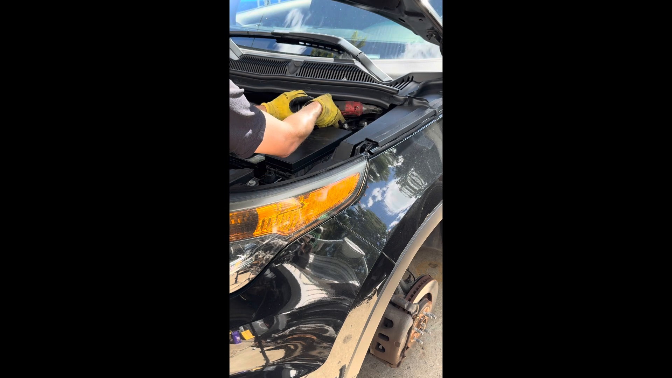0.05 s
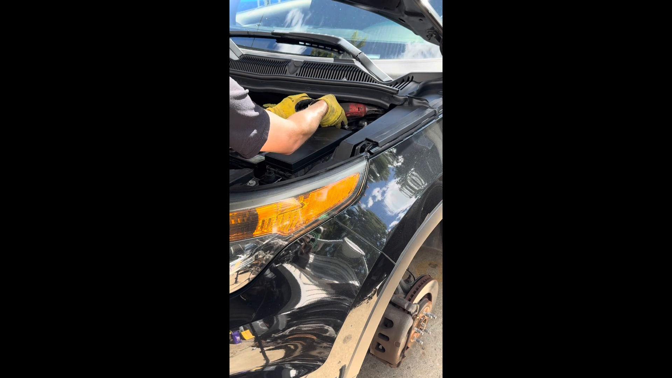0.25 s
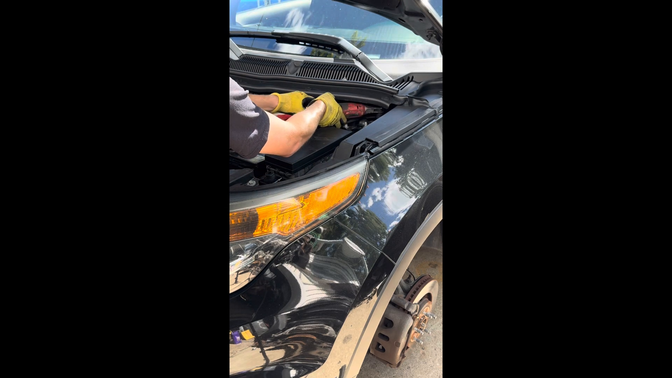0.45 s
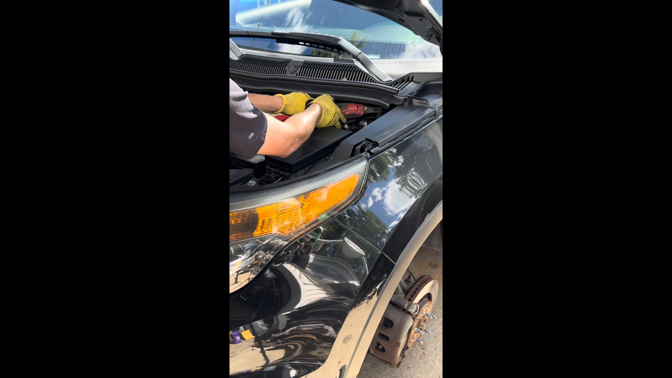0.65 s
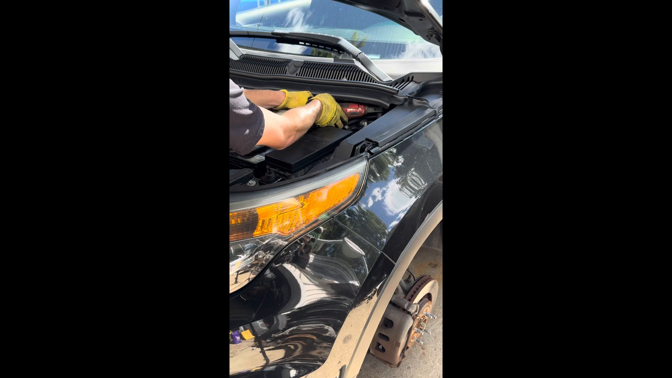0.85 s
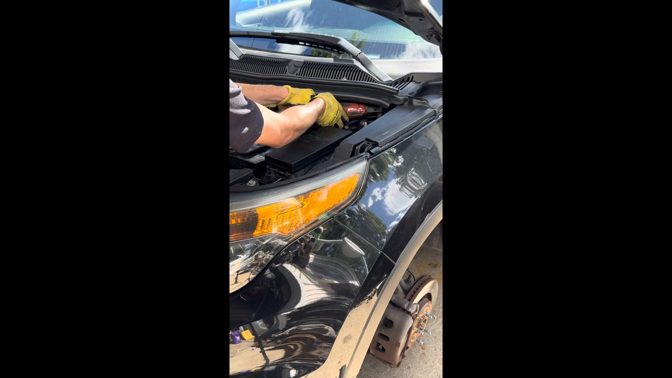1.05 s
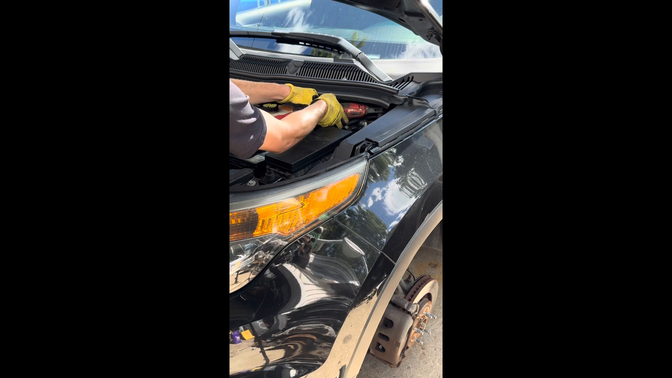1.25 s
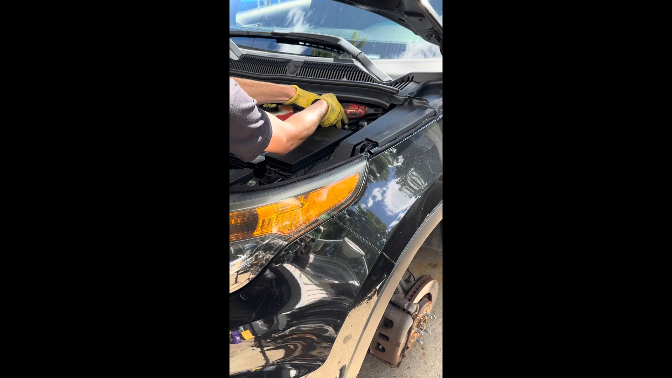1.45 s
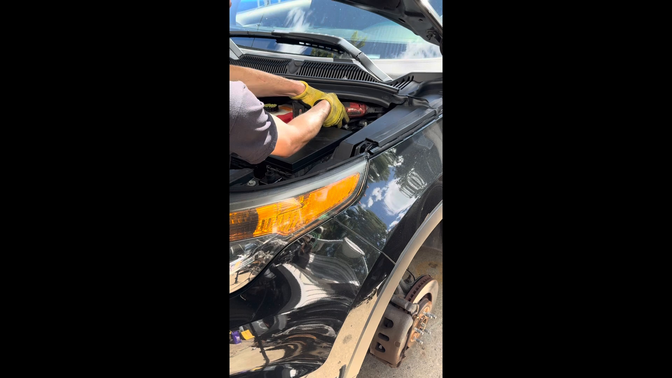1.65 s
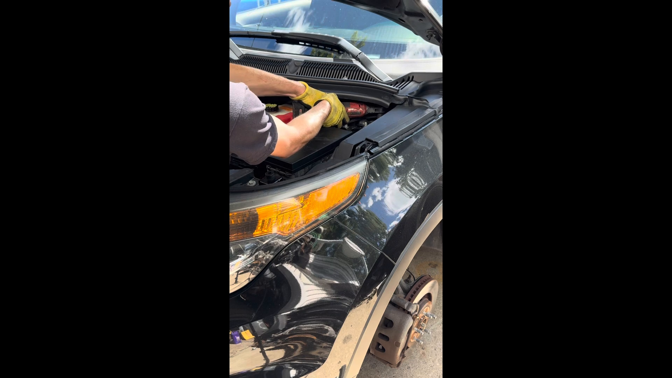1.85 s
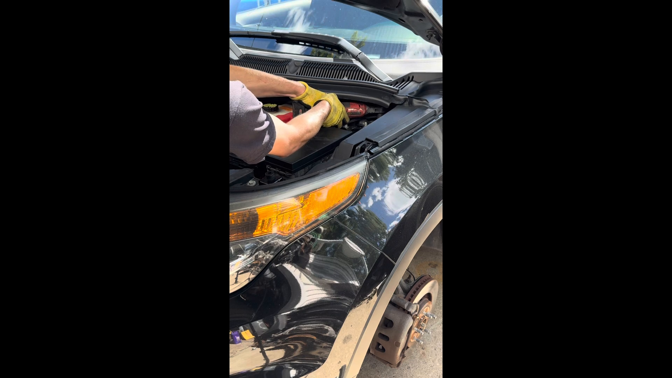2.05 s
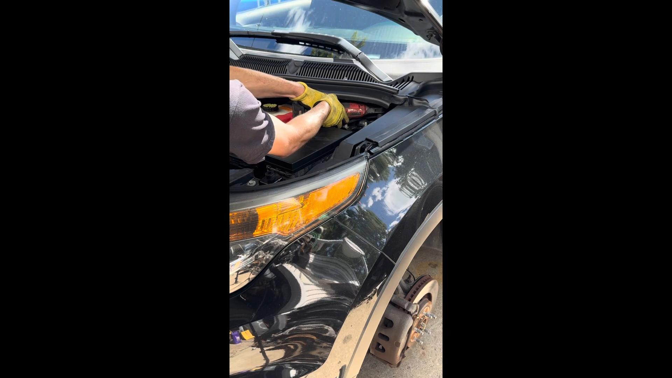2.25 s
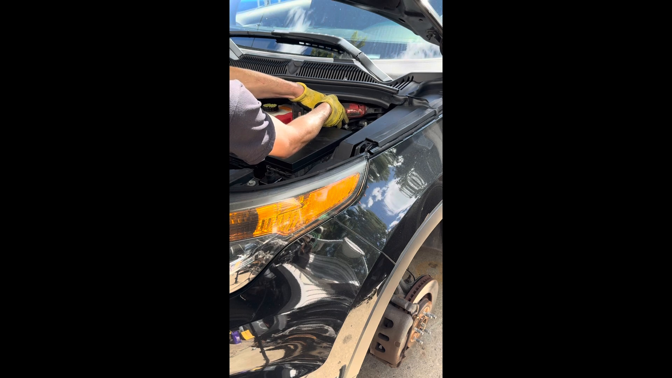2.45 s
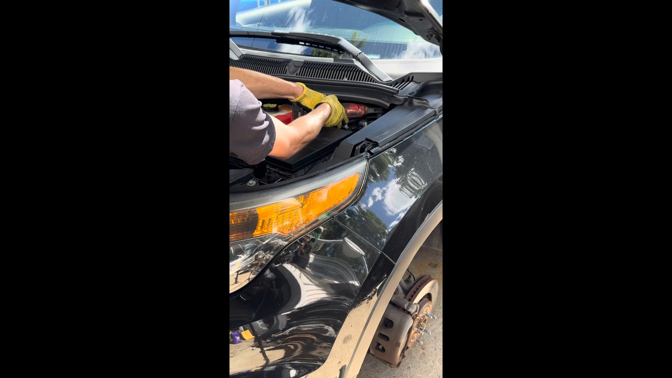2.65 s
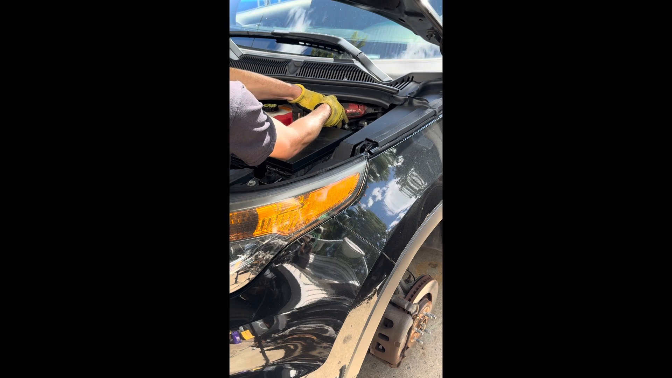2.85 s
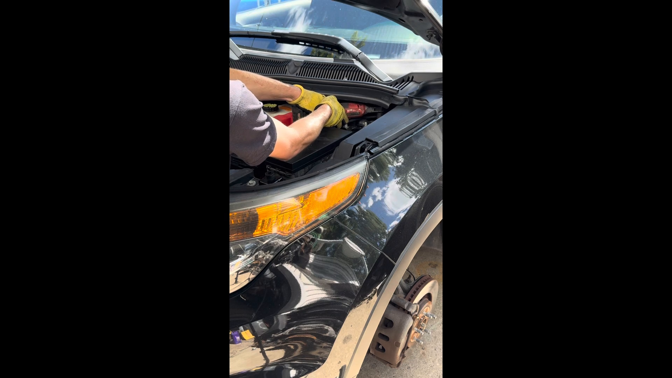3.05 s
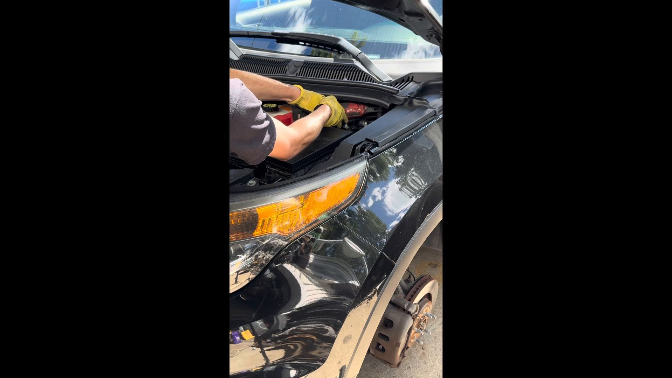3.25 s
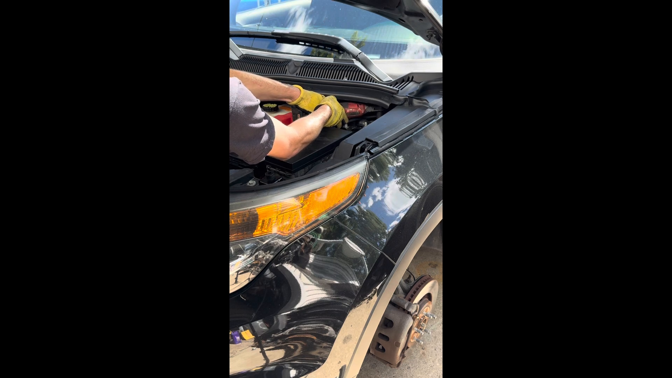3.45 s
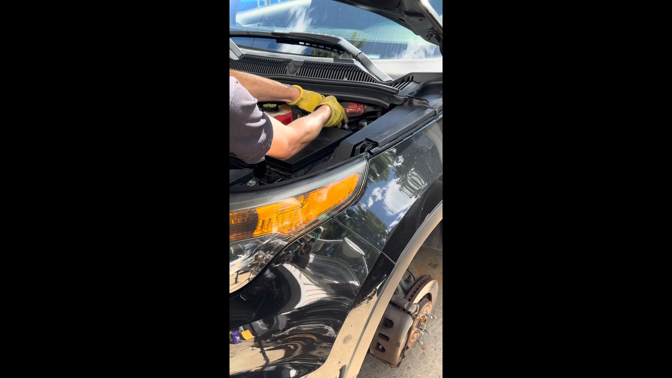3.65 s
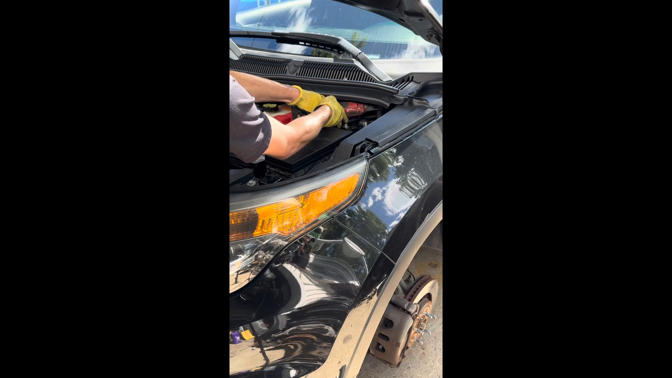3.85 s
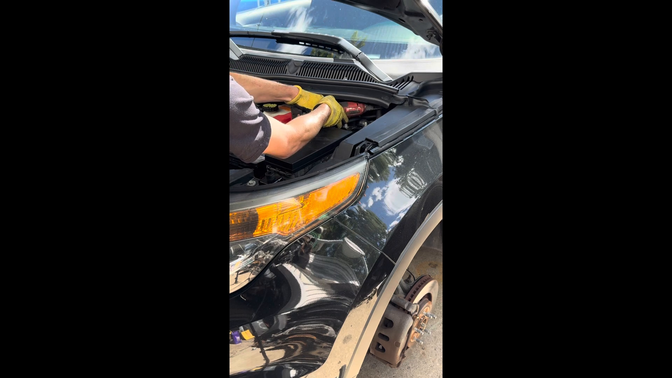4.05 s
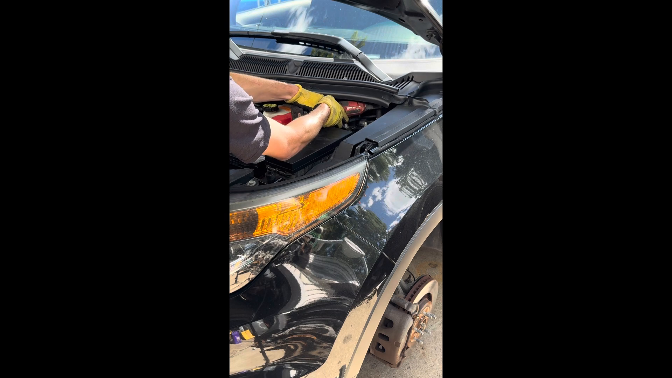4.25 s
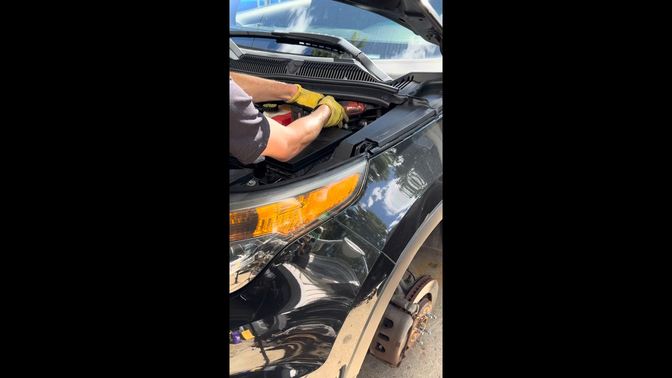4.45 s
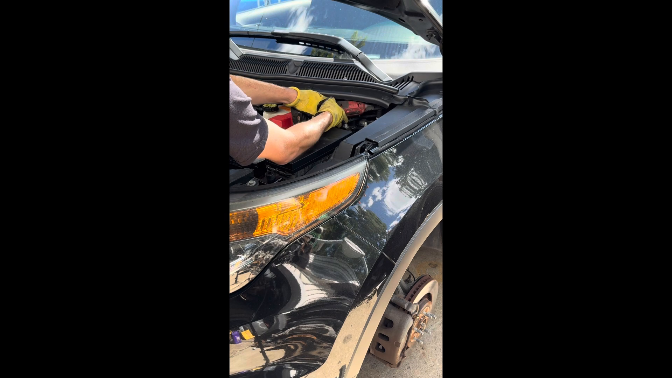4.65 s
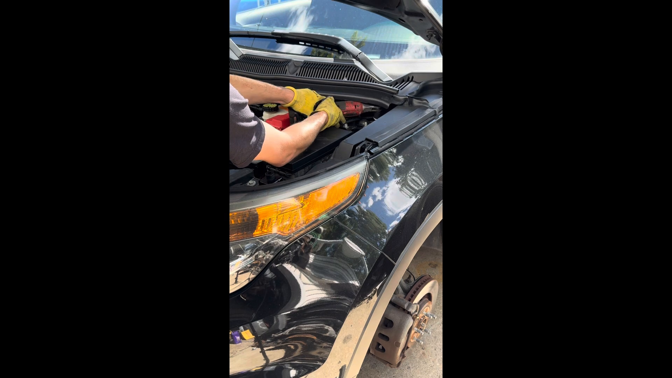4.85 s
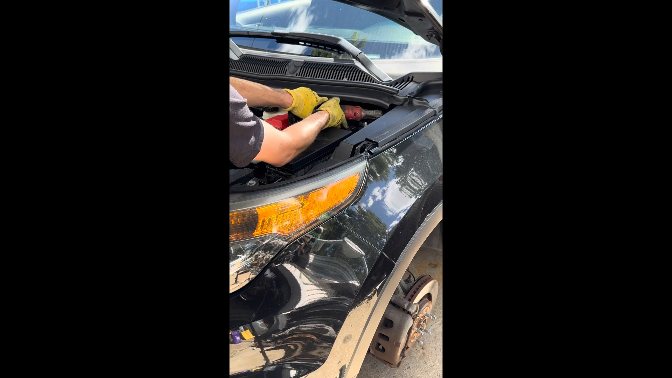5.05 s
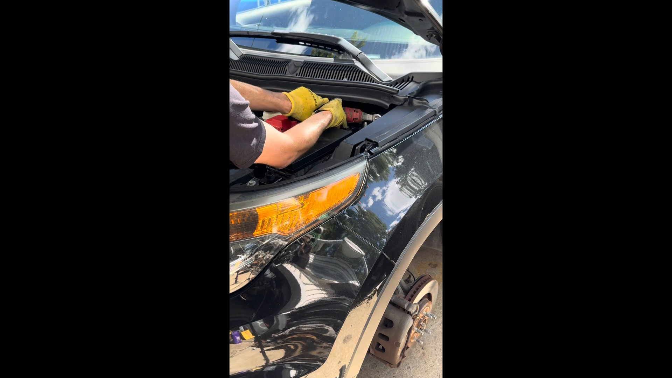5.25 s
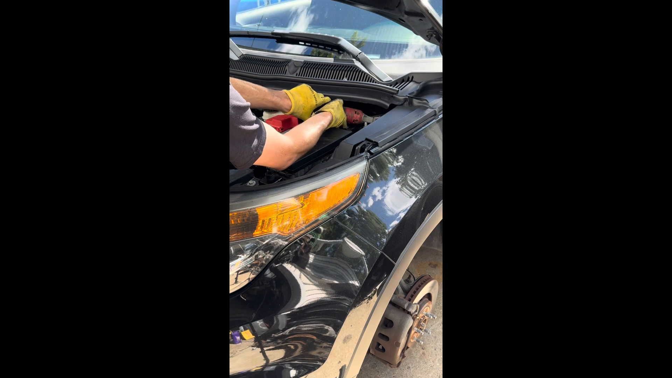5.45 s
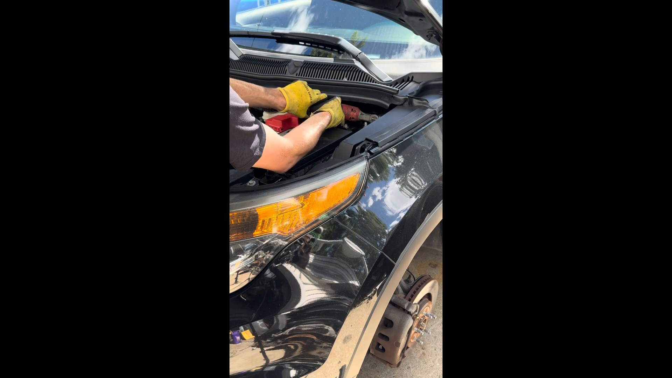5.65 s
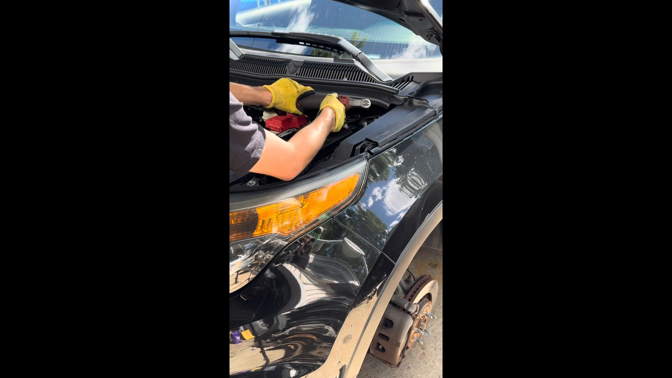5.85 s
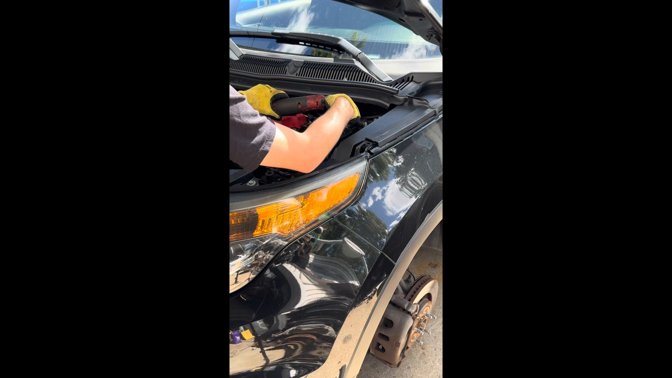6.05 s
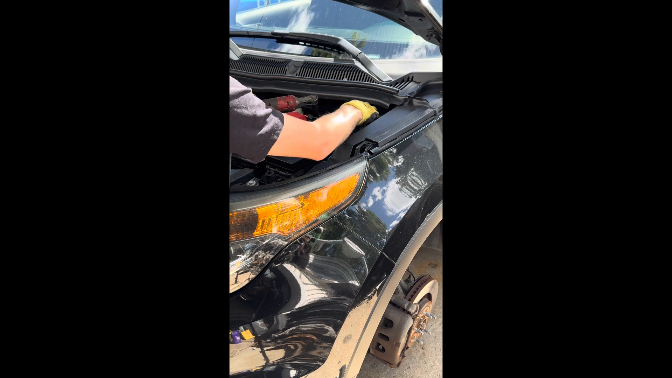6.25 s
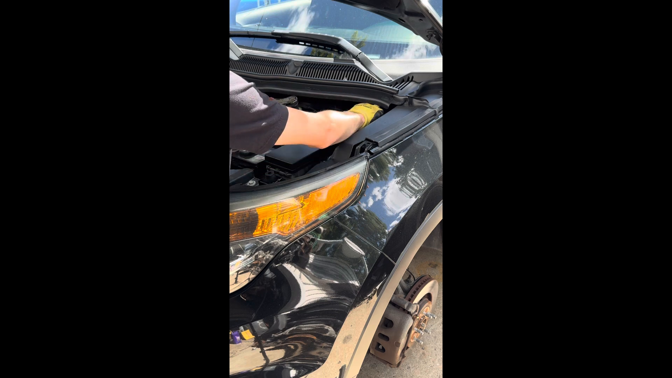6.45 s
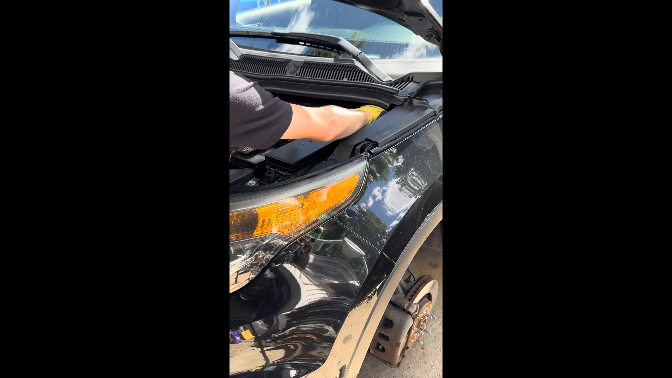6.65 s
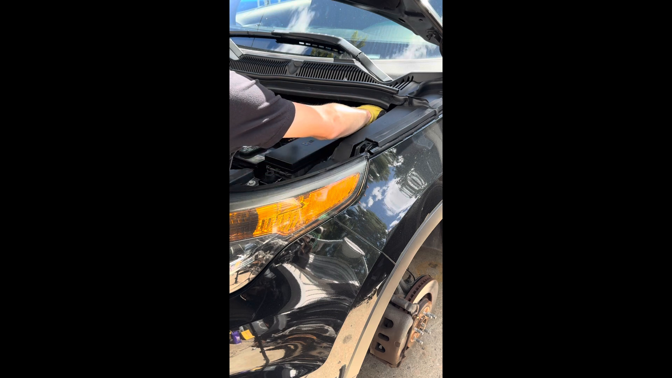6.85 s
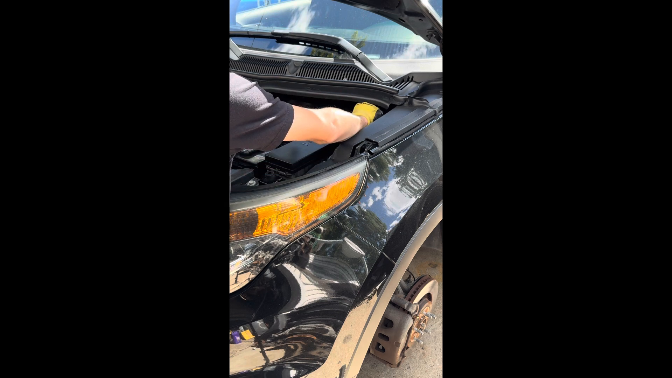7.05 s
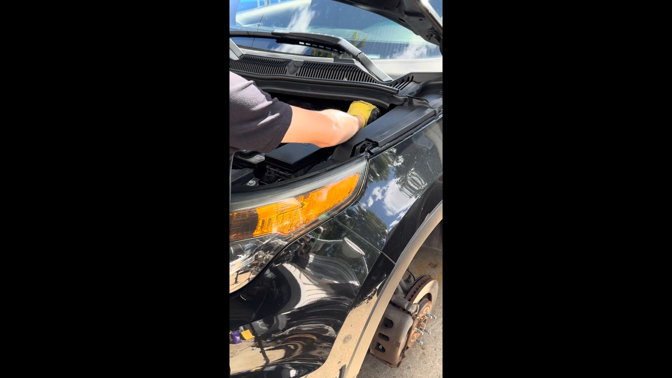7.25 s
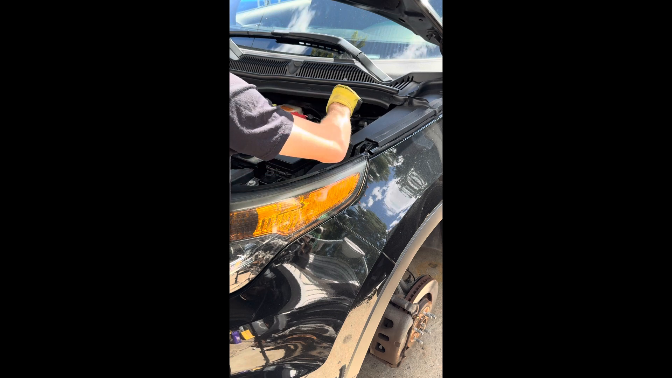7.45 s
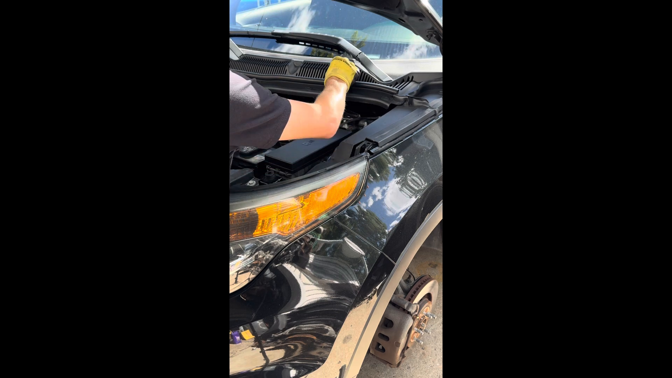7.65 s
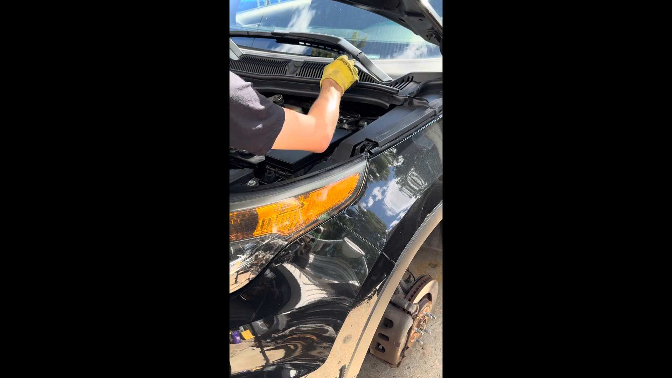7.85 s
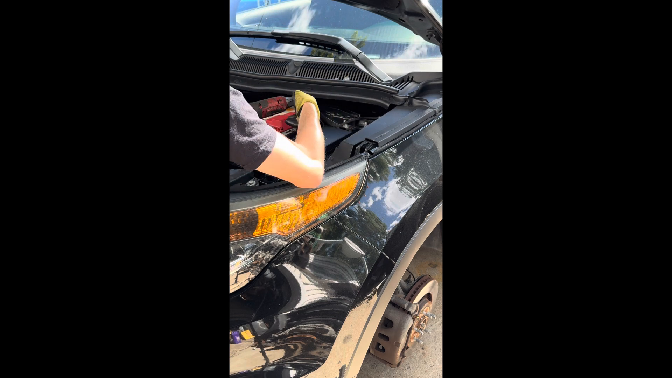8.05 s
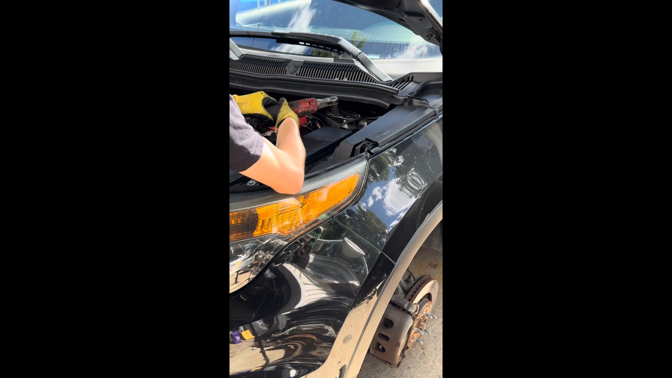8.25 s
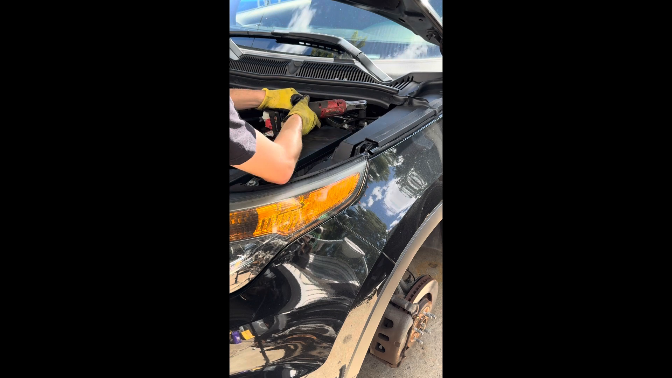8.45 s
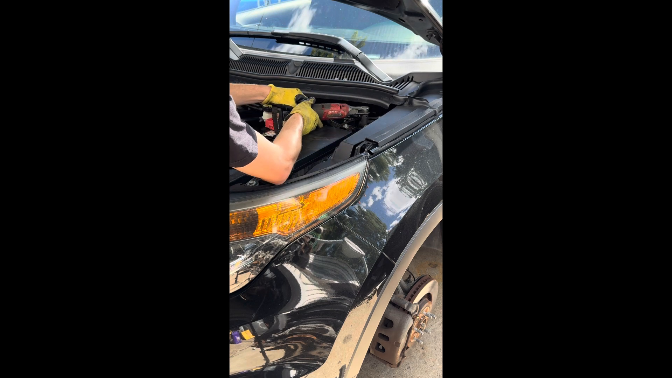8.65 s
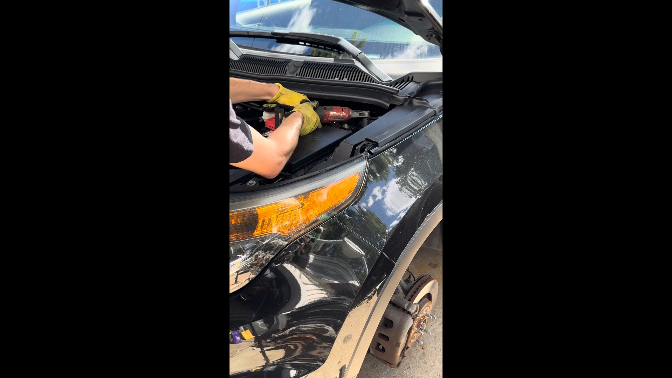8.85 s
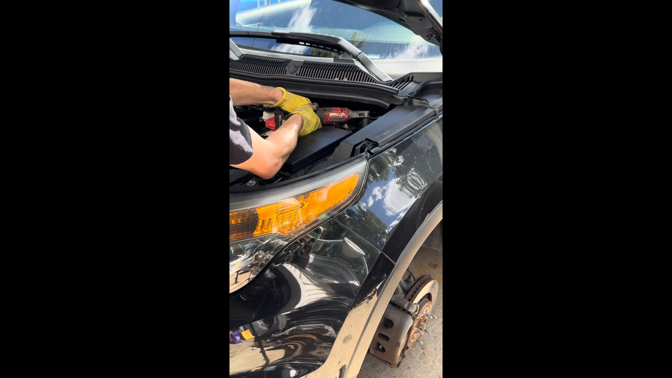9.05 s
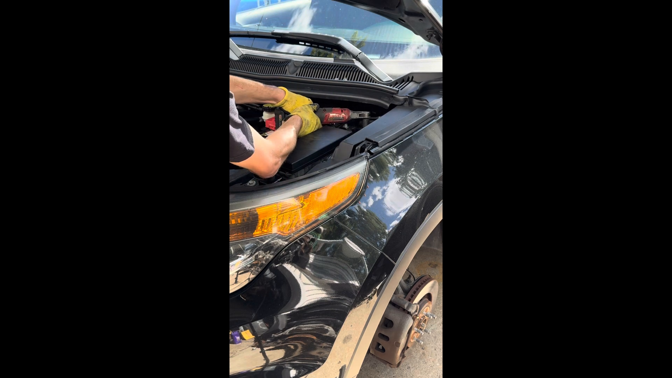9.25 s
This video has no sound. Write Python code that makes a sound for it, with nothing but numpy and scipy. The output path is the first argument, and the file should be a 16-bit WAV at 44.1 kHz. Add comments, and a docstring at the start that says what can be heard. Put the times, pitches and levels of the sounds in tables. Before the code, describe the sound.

Bright socket clinks, a half-second ratchet buzz with metal clatter, and a tiny high squeak come first. The tool then runs steadily, raspy at first, becoming looser and more tonal before stopping. Several seconds of sparse handling sounds sit over low outdoor rumble, with hollow trim knocks, until hard clanks and a renewed loaded whir end it. Close, slightly ringing engine bay, open air.

```python
"""Cordless ratchet under a bonnet

A cordless ratchet runs fasteners on a strut mount under a car's open bonnet, a metre or two from a phone.
Each crank turn excites steel, gear-case and panel resonances with a pawl snap; under load the drive bucks.
Turn-rate harmonics form its hum, and the nut rasps and squeaks as filtered noise.
Decaying noise and partials make the socket's clanks and the knocks on plastic trim, over a low outdoor rumble.
"""
import sys
import numpy as np
from scipy import signal
from scipy.fft import rfft, irfft, next_fast_len
from scipy.io import wavfile
from scipy.ndimage import uniform_filter1d, minimum_filter1d

SR = 44100
rng = np.random.default_rng(int(sys.argv[2]) if len(sys.argv) > 2 else 0)


def materialize(psi):
    """Save the field psi as 16-bit PCM at rate SR to the path in sys.argv[1].

    A 1-D psi becomes a single channel; in a 2-D psi each row is a channel.
    """
    bounded = np.clip(np.atleast_2d(psi).T, -1, 1)
    quanta = np.round(bounded * 32767).astype(np.int16)
    wavfile.write(sys.argv[1], SR, quanta)


N = 410571
T = np.arange(N) / SR
PADDED = next_fast_len(N + SR // 4, True)
HZ = np.fft.rfftfreq(PADDED, 1 / SR) + 1e-3  # the offset avoids division by zero
# All level_db columns are relative levels: shares of a mix that is balanced further below.


def undb(db):
    """Logarithmic level: decibels to amplitude gain."""
    return 10 ** (np.asarray(db) / 20)


def unit(x):
    """Power normalisation: scale to rms 1."""
    return x / np.sqrt(np.mean(x ** 2))


def noise():
    """White noise: equal power at all frequencies."""
    return rng.standard_normal(N)


def colour(points):
    """Spectral envelope: a response through (pitch_hz, level_db) points, straight over log frequency."""
    hz, db = np.transpose(points)
    return undb(np.interp(np.log(HZ), np.log(hz), db))


def modes(table):
    """Modal superposition: a sum of resonances, neighbours swinging in opposite directions."""
    response = 0
    for k, (hz, width_hz, db) in enumerate(table):
        response = response + (-1) ** k * undb(db) / (1 + 1j * (HZ - hz * hz / HZ) / width_hz)
    return response


def through(x, response):
    """Linear filtering: multiply the spectrum by a response, at rms 1."""
    return unit(irfft(rfft(x, PADDED) * response, PADDED)[:N])


def fade(t, t60):
    """Exponential decay: 60 dB lost in t60 seconds, starting at t = 0."""
    return (t >= 0) * np.exp(-np.log(1000) * np.maximum(t, 0) / t60)


def swell(start, end):
    """Arched envelope: a rounded rise and fall between two times."""
    return np.sin(np.pi * np.clip((T - start) / (end - start), 0, 1)).clip(0) ** .5


def ramp(start, length):
    """Linear onset: a straight rise from 0 to 1."""
    return np.clip((T - start) / length, 0, 1)


def walk(hz):
    """Slow random modulation: a new target hz times a second, spread about 1."""
    steps = rng.standard_normal(size=1024)
    return 1.2 * np.interp(T * hz, np.arange(len(steps)), steps)


def add(track, s, sound):
    """Superposition: mix a sound in at a time."""
    i = max(int(s * SR), 0)
    track[i:i + len(sound)] += sound[:N - i]


# spectrum of the outdoor rumble: pitch_hz [Hz], level_db [dB]
OUTDOORS = [(15, -49.5), (25, -24.5), (92, -6), (130, -11.5), (149, -16.5), (212, -15.5), (326, -22.5),
            (591, -25.5), (988, -31), (1260, -31), (1400, -31.5), (3720, -46), (7110, -44), (16000, -71.5)]
# slow swell of the rumble: time_s [s], level_db [dB]
RUMBLE = [(0, 6), (1.7, 5), (2.5, -2), (5.2, -2.5), (6.4, 3), (7.5, 4.5), (8.3, 3.5), (9.3, 9.5)]
OUTDOORS_DB = -52


def outdoors(waver_db=1.6):
    """Amplitude-modulated noise: a slowly swelling rumble with the faint hum of distant machinery."""
    waver = undb(waver_db * unit(uniform_filter1d(noise(), SR // 8)))
    rumble = waver * through(noise(), colour(OUTDOORS))
    hum = through(noise(), modes([(58.5, 19, -2.0), (82.0, 5.4, -0.5), (124.0, 1.9, -3.0)]))
    return undb(OUTDOORS_DB + np.interp(T, *np.transpose(RUMBLE))) * (0.81 * rumble + 0.45 * hum)


# steel striking steel; the note depends on how the socket sits:
# start_s [s], ring_db [dB], sparkle_db [dB], clack_db [dB], thud_db [dB], note_hz [Hz], note_db [dB]
CLANKS = [(0.0014, -20, -21.5, -24.5, -37.5, 3260, -34.5), (0.204, -41, -49, -50, -59, 2600, -38),
          (0.2202, -13.5, -15.5, -36, -38, 3020, -41), (0.2263, -16, -32, -20, -19.5, 3000, -35),
          (0.323, -18.5, -23, -26, -25.5, 3070, -26), (0.748, -34.5, -21, -52, -33, 3720, -46),
          (0.944, -3, -0.5, -35, -26, 5300, -16), (0.987, -14, -2, -38, -14.5, 2740, -17),
          (1.062, -33, -20, -37, -27, 5880, -24), (1.1104, -8, -3.5, -38, -35, 3240, -20),
          (1.1627, -9, -5, -12, -18, 3010, -30), (1.22, -27, -22, -17, -25, 2470, -17),
          (1.28, -27, -37, -28, -36, 2933, -33), (1.332, -33, -29, -44, -48, 2580, -46),
          (1.357, -23, -21, -31, -37, 2750, -38), (1.565, -7.5, -11, -33, -17.5, 2630, -17),
          (1.6186, -7, -8, -35, -35, 4894, -17), (1.6822, -17, -21, -12, -14.5, 2940, -20),
          (5.0678, -19.5, -18.5, -50, -40.5, 3120, -36), (5.108, -39, -43, -46, -54, 3500, -54),
          (5.136, -49, -47, -56, -50, 3130, -54), (5.264, -45, -58, -47, -65, 2480, -51),
          (5.3274, -45, -46, -35, -25.5, 3090, -42.5), (5.364, -53, -58, -49, -39, 2890, -57),
          (5.59, -24, -16.5, -45, -53, 2800, -36), (5.5956, -18.5, -16, -39, -47, 2520, -32),
          (5.634, -35, -37.5, -49, -49, 2560, -40), (6.645, -56, -58.5, -63.5, -63, 2660, -60),
          (6.7086, -25.5, -12, -43, -46, 2680, -36), (6.714, -16.5, -16, -33, -38, 2660, -33),
          (6.7933, -46, -50, -46, -48, 2740, -54), (6.804, -49, -53, -47, -56, 2680, -52),
          (8.6457, -16.5, -19.5, -31, -31.5, 2465, -28), (8.8067, -6.5, -9, -17.5, -22, 2593, -17.5),
          (8.8479, -19.5, -30, -31, -26, 5480, -33), (9.009, -42, -44, -43, -47, 2295, -48),
          (9.0597, -31, -18, -46.5, -49, 2799, -50), (9.087, -15, -9, -28, -25, 2760, -33),
          (9.142, -6.5, -6, -33, -47, 2580, -19), (9.184, -5, -13, -13, -36, 2506, -19),
          (9.2585, -7, -6, -13, -23.5, 2707, -18)]
# spectrum of the steel clink: pitch_hz [Hz], level_db [dB]
CLINK = [(1000, -14), (1700, -8), (2200, 0), (3000, 2), (3500, -8), (4400, 0), (5300, -5.5), (6500, -9.5),
         (9000, -20.5), (16000, -41.5)]
# spectrum of the bright sparkle: pitch_hz [Hz], level_db [dB]
SPARKLE = [(3000, -31.5), (5000, -12), (6500, -3), (8000, 2.5), (10000, 4), (12500, -27.5), (14000, -5.5),
           (16000, -5.5)]
# resonances of the strut tower and panels: pitch_hz [Hz], width_hz [Hz], level_db [dB]
PANELS = [(239, 41, -5.5), (310, 37, 1), (367.6, 27, -1), (484, 36, 1.5), (573, 92, -3.5), (624, 51.7, 1.5),
          (727, 15, -10.5), (797, 58, -9.5)]
# low boom of the cowl when knocked or leaned on: pitch_hz [Hz], width_hz [Hz], level_db [dB]
COWL = [(205, 53, -4.5)]
# resonances of the gear case: pitch_hz [Hz], width_hz [Hz], level_db [dB]
CASE = [(768, 70, -2.5), (1050, 100, -2.5), (1219, 80, 2), (1570, 240, -2), (1800, 120, 4), (2280, 480, -1)]
# resonances of the ratchet head and socket: pitch_hz [Hz], width_hz [Hz], level_db [dB]
HEAD = [(2325, 130, -1.5), (2553, 110, 1.5), (2737, 85, 3), (3007, 95, 1.5), (3627, 620, -5.5),
        (4230, 460, -5.5), (4803, 300, -8), (5500, 480, -4.5), (7405, 1000, -4.5)]


def clanks(panels, case, head, t60=0.095, rebound_s=0.0052, rebound=0.42, third=0.18, attack_s=0.0007,
           tail_t60=0.25, tail_db=-13, thud_t60=0.18, thud_rise_s=0.0075, note_width_hz=270, rattle_db=2.5):
    """Impact excitation: the socket strikes and rebounds twice; the head rings at once, panels swell later."""
    t = T[:SR // 2]
    # sounds overlap as powers; only the pitched note adds as a wave
    ring, bright, clack, thud, note = np.zeros((5, N))
    contacts = sum((size * fade(t - k * rebound_s, t60)) ** 2 for k, size in enumerate([1, rebound, third]))
    power = (contacts + (undb(tail_db) * fade(t, tail_t60)) ** 2) * (1 - np.exp(-t / attack_s))
    thud_shape = fade(t, thud_t60) * (1 - np.exp(-t / thud_rise_s))
    for s, ring_db, bright_db, clack_db, thud_db, note_hz, note_db in CLANKS:
        add(ring, s, power * undb(ring_db) ** 2)
        add(bright, s, power * undb(bright_db) ** 2)
        add(note, s, undb(note_db) * np.sqrt(2 * contacts) * np.sin(2 * np.pi * note_hz * t))
        add(clack, s, power * undb(clack_db) ** 2)
        add(thud, s, (undb(thud_db) * thud_shape) ** 2)
    # loose parts chatter on after the blow
    rattle = unit(undb(rattle_db * unit(uniform_filter1d(noise(), SR // 250))))
    steel = unit(through(noise(), colour(CLINK)) + .6 * through(noise(), head))
    sparkle = through(noise(), colour(SPARKLE))
    # slow noise spreads the note into a cluster of close partials
    beating = through(noise(), 1 / (1 + (HZ / note_width_hz) ** 4))
    return (note * beating
            + undb(-11.5) * rattle * steel * ring ** .5
            + undb(-13.5) * rattle * sparkle * bright ** .5
            + undb(-7.5) * through(noise(), case) * clack ** .5
            + undb(0.5) * through(noise(), panels) * thud ** .5)


def overtones(level_db=-19, t60=0.061, count=10):
    """Inharmonic partials: each blow wakes a different handful in the steel; the hand damps them quickly."""
    out, t = np.zeros(N), T[:SR // 5]
    woken_hz = rng.uniform(2200, 8000, (len(CLANKS), count))
    for (s, ring_db, *_), pitches in zip(CLANKS, woken_hz):
        # each pitch also serves as its own arbitrary starting phase
        partials = np.sin(2 * np.pi * np.outer(pitches, t) + pitches[:, None]).sum(axis=0)
        add(out, s, undb(ring_db + level_db) * fade(t, t60) * partials)
    return out


def width(clank, clank_db=-19, air_db=-69):
    """Stereo difference: glancing clank reflections and midrange outdoor air reach the ports unequally."""
    air_colour = [(150, -25.5), (400, -2.5), (650, -1.0), (1250, -8.5), (1600, -36.0), (4000, -59.0)]
    air = through(noise(), colour(air_colour))
    reflection = np.roll(np.gradient(clank), SR // 1000)  # a millisecond late, tilted to the treble
    return (undb(clank_db) * reflection + undb(air_db) * air) * np.array([[1], [-1]])


# short pitched taps on a hollow cover: start_s [s], level_db [dB]
TAPS = [(0.042, -27), (0.5545, -40.5), (8.932, -45)]
# notes of the cover: pitch_hz [Hz], level_db [dB], t60_s [s]
COVER = [(970, -5, .05), (1110, -1.5, 0.082), (1360, -3, 0.021), (1785, -18, .02), (2917, -17.5, .02)]


def taps():
    """Free vibration: each tap lets the cover's damped notes ring briefly."""
    out, t = np.zeros(N), T[:SR // 5]
    note = sum(undb(db) * fade(t, t60) * np.sin(2 * np.pi * hz * t) for hz, db, t60 in COVER)
    for s, db in TAPS:
        add(out, s, undb(db) * note)
    return out


# brief whistles of the motor drive: start_s [s], end_s [s], pitch_hz [Hz], level_db [dB]
WHISTLES = [(0.721, 0.76, 7960, -55.5), (8.992, 9.066, 8005, -48), (8.997, 9.079, 4380, -52)]


def whistles(width_hz=170):
    """Narrow-band noise: the motor drive whistles as the trigger closes."""
    out = np.zeros(N)
    for start, end, hz, db in WHISTLES:
        tone = through(noise(), modes([(hz, width_hz, 0)]) ** 2)  # the resonance acts twice
        out += undb(db) * swell(start, end) * tone
    return out


# the crank at full trigger: time_s [s], turn_rate_hz [Hz]
SPEED = [(0.91, 119.6), (1.24, 117.1), (1.6, 103), (1.76, 103.3), (1.86, 110.9), (2.21, 112.7),
         (2.71, 112.2), (2.93, 114.2), (3.16, 110.3), (3.27, 111.9), (3.48, 120), (3.8, 121), (4.24, 120.2),
         (4.42, 122.6), (4.57, 121.7), (4.71, 121.6), (4.8, 116.4), (9.12, 96.8), (9.31, 126.4)]
# pulls of the trigger: press_s [s], release_s [s], rise_s [s], share of full speed [0-1],
# steel_db [dB] (pawl and steel), gears_db [dB] (chatter), body_db [dB] (bodywork)
PULLS = [(0.738, 1.238, .115, 1, -22.5, -29, -27), (1.335, 1.484, .035, 0.49, -38, -42, -36.5),
         (1.5, 1.54, 0.031, 0.53, -41, -52, -52), (1.536, 4.806, .04, 1, -24.5, -28, -29),
         (9.035, 9.395, 0.089, 0.93, -24.5, -28, -27)]
COAST_T60_S, BODY_COAST_T60_S = .17, 0.35  # decay of drive strength after release; the panels settle later
SPIN_POWER = .2  # speed goes as this power of the drive's strength
BODY_RISE = 2.1  # the panels' own onset lasts this many drive rises
STEEL_LOAD_DB, GEARS_LOAD_DB, BODY_LOAD_DB = 8.5, 4.5, 5.5  # added at full load
# the nut leaves the stud, so gears and bodywork quieten until the last pull
NUT_OFF_S, NUT_OFF_FADE_S, NUT_OFF_DB = 4.685, 0.027, -6


def drive(load):
    """Spin-up and coast-down: gives crank speed and the gains of steel, gears and body, louder under load."""
    spin, steel, gears, body = np.zeros((4, N))
    for press, release, rise, share, steel_db, gears_db, body_db in PULLS:
        attack, since = ramp(press, rise) ** 2, np.maximum(T - release, 0)
        strength = attack * fade(since, COAST_T60_S)
        spin = np.maximum(spin, share * strength ** SPIN_POWER)
        steel = steel + undb(steel_db) * strength
        gears = gears + undb(gears_db) * strength
        panel_onset = attack * ramp(press, BODY_RISE * rise)
        body = body + undb(body_db) * panel_onset * fade(since, BODY_COAST_T60_S)
    off_db = NUT_OFF_DB * ramp(NUT_OFF_S, NUT_OFF_FADE_S) * (T < PULLS[-1][0])
    hz = spin * np.interp(T, *np.transpose(SPEED))
    return (hz, steel * undb(STEEL_LOAD_DB * load),
            gears * undb(GEARS_LOAD_DB * load + off_db), body * undb(BODY_LOAD_DB * load + off_db))


def tooth_strikes(per_s=450):
    """Random impulses: now and then a tooth jumps across its play and lands with a single tick."""
    return unit((rng.random(N) < per_s / SR) * noise())


# resonances of the unloaded gears: pitch_hz [Hz], width_hz [Hz], level_db [dB]
SLACK = [(820, 130, 0), (1074, 95, -1)]
SLACK_DB = -9
DRAGGING_ENDS_S = (3.123, 3.553)  # the thread stops dragging over this span


def gear_slack(chatter):
    """Backlash: once the thread no longer drags, the gears rattle in their play with a lower note."""
    loose = np.interp(T, DRAGGING_ENDS_S, [0, 1]) * (T < PULLS[-1][0])
    return undb(SLACK_DB) * loose * through(chatter * noise(), modes(SLACK))


# the crank's hum at three stages of the nut:
# harmonic [number], dragging_db [dB], loosening_db [dB], easy_db [dB]
HUM = [(1, -52.5, -51.5, -48), (2, -33.5, -37.5, -51), (3, -41.5, -40, -39), (4, -33.5, -39.5, -37),
       (5, -44, -39, -38.5), (6, -37.5, -42, -42), (7, -39.5, -39, -41.5), (8, -49, -47, -51),
       (9, -52, -43, -51), (10, -49.5, -49, -52), (11, -43, -50, -51.5)]
EASY_STARTS_S = 3.86  # the last balance sets in at once


def crank_hum(turns, waver_db=2.0, waver_hz=9, flutter_db=1.95, flutter_hz=45, smear=0.085, smear_hz=45):
    """Harmonic synthesis: multiples of the turn rate; gear play roughens the upper ones, the nut shifts them."""
    loose, easy = np.interp(T, DRAGGING_ENDS_S, [0, 1]), T > EASY_STARTS_S
    hum = np.zeros(N)
    for k, dragging_db, loosening_db, easy_db in HUM:
        level_db = (1 - loose) * dragging_db + (loose - easy) * loosening_db + easy * easy_db
        unsteady_db = np.sqrt(k) / 2 * (waver_db * walk(waver_hz) + flutter_db * walk(flutter_hz))
        wave = np.sqrt(2) * np.sin(2 * np.pi * k * turns + smear * k * walk(smear_hz))
        hum += undb(level_db + unsteady_db) * wave
    return hum


WHINE_TEETH = 14  # gear teeth met per crank turn
WHINE_S, WHINE_DB = (1.6, 2.5), -31.5  # start and end; level


def gear_whine(turns, smear=0.3):
    """Tooth-mesh frequency: one gear mesh sings a nearly steady note while the thread still drags."""
    return undb(WHINE_DB) * swell(*WHINE_S) * np.sin(2 * np.pi * WHINE_TEETH * turns + smear * walk(30))


# resistance of the thread: time_s [s], load [0-1]
LOAD = [(0.75, 0.88), (0.98, 0.9), (1.69, 0.81), (1.79, 0.4), (1.92, 0.39), (2.3, 0.25), (3.3, 0.03),
        (4.65, 0.05), (9.1, 1), (9.3, 0.6)]
# spectrum of the pawl's steel: pitch_hz [Hz], level_db [dB]
STEEL = [(1200, -23.5), (2200, -16.5), (2900, -5), (3600, 0.5), (5000, 0), (6300, -11.5), (6800, -4.5),
         (7300, -3), (7900, -3), (9000, 4), (11000, -2), (13500, 2.5), (16000, -3)]
# crank turns to one revolution of the socket; a moment when the tool leans hardest
TURNS_PER_REV, SURGE_S = 25.82, 2.42
# the nut wobbles on its last threads and shakes the panels harder: start and end; most dB added
WOBBLE_S, WOBBLE_DB = (3.875, 4.31), 2.5


def ratchet(panels, case, head, jitter=.004, scatter_db=0.5, snap_turns=0.16, buck_db=1.5, grit_db=2.0,
            hum_dip_db=7.5, body_surge_db=1.0, gear_flutter_db=1.16, steel_flutter_db=0.84, throb_db=3.5):
    """Periodic excitation: each crank turn snaps the pawl, rolls the gear teeth past and kicks the tower."""
    load = np.clip(np.interp(T, *np.transpose(LOAD)), 0, 1)
    hz, steel_gain, gears_gain, body_gain = drive(load)
    strain = load ** 2
    waver = unit(uniform_filter1d(noise(), SR // 100))
    turns = np.cumsum(hz * (1 + jitter * (1 + 4 * strain) * waver)) / SR
    turn, phase = turns.astype(int), turns % 1
    running = hz > hz.max() / 2

    # under load the drive winds up and lets go on every third turn
    bucks = np.cos(2 * np.pi * turn / 3)
    scatter = scatter_db * rng.standard_normal(size=2048)[turn]
    size = undb(scatter + buck_db * strain * (bucks + 8.0))
    snap = size * np.exp(-phase / snap_turns)
    snap = snap / np.sqrt(np.mean(snap[running] ** 2)) * (hz > 1)
    kick = unit(np.diff(turn, prepend=0) * size)

    # the same tooth flaws come round on every turn; the contact wanders slowly from flank to flank
    flaws = rng.standard_normal(size=(256, 4))
    flaws = unit(flaws * np.abs(flaws))  # a few teeth tick much harder than the rest
    tooth = (phase * len(flaws)).astype(int)
    teeth = sum(flank[tooth] * walk(9) for flank in flaws.T) / 2 * running
    grains = np.repeat(rng.standard_normal(N // 32 + 1), 32)[:N]  # each held for 32 samples
    grit = unit(undb(grit_db * grains))
    chatter = unit(0.88 * grit + (.9 - 1.07 * strain) * snap)
    strikes = tooth_strikes()

    pawl = through(chatter * noise() + 0.25 * strikes + 0.5 * teeth, colour(STEEL))
    ring = through(chatter * noise() + 0.28 * strikes + 0.25 * teeth, head)
    # pressed hard, the pawl also grinds over the drive wheel
    grind_modes = modes([(3080, 100, 2.0), (4230, 680, -9.0), (5650, 550, -4.0)])
    grind = through(noise() * (0.55 + 0.28 * snap), grind_modes)
    # a slowly moving pawl lands softly, with less treble
    soft_pawl = pawl * (hz / hz.max()) ** 0.31
    steel = (soft_pawl + (0.69 + 0.16 * strain) * ring + 0.55 * strain * grind) / (1.1 + 0.42 * strain)
    gears = through(chatter * noise() + 0.67 * teeth + 0.16 * kick + 0.55 * strikes, case)
    gears = gears + gear_slack(chatter)

    # a free-running crank kicks evenly; a loaded one rattles the panels and shakes the whole front
    rattle = through(noise() * (0.92 + 0.26 * snap), panels)
    shake_colour = [(38, -36.5), (62, -5.5), (100, 1.0), (160, -2.0), (235, 2.5), (400, -13.0), (1000, -31.5)]
    shake = through(noise(), colour(shake_colour))
    body = 0.022 * through(kick, panels) + (0.46 + 0.32 * strain) * rattle + (0.071 + 0.14 * strain) * shake
    # a loaded drive throbs unevenly against the bodywork
    wobble = undb(WOBBLE_DB * swell(*WOBBLE_S))
    body = body * wobble * undb(throb_db * strain * walk(60))

    # the tool leans once per socket revolution and rocks in the hand, so the body rattle surges
    leaning = np.cos(2 * np.pi * (turns - np.interp(SURGE_S, T, turns)) / TURNS_PER_REV)
    sway = unit(uniform_filter1d(uniform_filter1d(noise(), SR // 25), SR // 40))
    rocking = sway + 0.9 * (1 - strain) * leaning
    # the hum sags briefly between one lean and the next
    sag = undb(-hum_dip_db * ((1 - leaning) / 2) ** 3)
    hum_gain = np.clip(1 - 1.5 * strain, .2, 1) ** 2 * gears_gain / np.median(gears_gain[running])
    hum = crank_hum(turns) * sag * wobble * (1 + 0.12 * waver) * hum_gain

    steel = undb(-0.77 + steel_flutter_db * walk(45)) * steel * steel_gain
    gears = undb(-1.5 + gear_flutter_db * walk(35)) * gears * gears_gain
    body = undb(1.0 + body_surge_db * rocking) * body * body_gain
    return steel + gears + body + hum + gear_whine(turns)


# a panel note that outlasts each pull
AFTER_RING_HZ, AFTER_RING_DB, AFTER_RING_T60_S = 670, -48.5, 1


def after_ring():
    """Stored vibration: one bonnet note builds through each pull and decays when the trigger is let go."""
    shaken = np.zeros(N)
    for press, release, *_ in PULLS:
        shaken += ramp(press, release - press) * fade(np.maximum(T - release, 0), AFTER_RING_T60_S)
    return undb(AFTER_RING_DB) * shaken * np.sin(2 * np.pi * AFTER_RING_HZ * T + 1.0 * walk(25))


# squeaks of the slowly turning fastener: start_s [s], end_s [s], level_db [dB]
SQUEAKS = [(1.396, 1.416, -29), (1.426, 1.45, -20), (1.46, 1.495, -33)]


def squeaks(hz=14300, width_hz=600):
    """Stick-slip friction: dry steel slips in thin, brief, very high squeaks of narrow-band noise."""
    tone = through(noise(), modes([(hz, width_hz, 0)]) ** 2)  # the resonance acts twice
    return tone * sum(undb(db) * swell(start, end) for start, end, db in SQUEAKS)


# resonances of the stud: pitch_hz [Hz], width_hz [Hz], level_db [dB]
STUD = [(1555, 76, 0.5), (1670, 65, -12), (1812, 44, -1), (2074, 230, -7), (2390, 120, -4.5),
        (2740, 220, -3.5)]
# ring of the socket as it spins loose: pitch_hz [Hz], width_hz [Hz], level_db [dB]
SOCKET = [(4730, 180, 1.5), (5030, 460, -4), (5700, 230, -4), (7386, 990, -7.5)]
# the nut rasps in its thread as it first turns freely, less and less as it loosens
RASP_S, RASP_RISE_S, RASP_DB, RASP_DB_PER_S = 1.64, 0.3, -25, -23.5
SOCKET_SINGS_S, SOCKET_DB = (4.715, 4.84), -23.5  # start and end; level


def fastener():
    """Friction-driven resonance: the nut rasps along the stud; later the freed socket sings as it spins."""
    rasp_db = RASP_DB + RASP_DB_PER_S * np.maximum(T - RASP_S - RASP_RISE_S, 0)
    rasp_gain = ramp(RASP_S, RASP_RISE_S) * undb(rasp_db) * (T < NUT_OFF_S)
    rasp = rasp_gain * undb(0.79 * walk(29)) * through(noise(), modes(STUD))
    song = undb(SOCKET_DB) * swell(*SOCKET_SINGS_S) * through(noise(), modes(SOCKET))
    return rasp + song


# gloves and tool sliding over the cowl: start_s [s], end_s [s], scuff_db [dB], rumble_db [dB] (hollow)
RUBS = [(5.09, 5.188, -70, -51.5), (5.432, 5.615, -65.5, -46.5), (5.802, 5.9, -51, -66.5),
        (5.856, 5.93, -61.5, -49), (5.908, 6.123, -58.5, -63), (7.154, 7.417, -60.5, -62),
        (7.757, 7.913, -65, -50), (7.998, 8.098, -53, -60.5), (8.1, 8.507, -61, -58),
        (8.512, 8.543, -66.5, -39.5), (8.64, 8.755, -67, -42.5), (8.745, 8.814, -46.5, -38)]


def rubs(panels, catch_db=2.5):
    """Sliding friction: catches and slips give an uneven scuff above, the panels murmuring below."""
    catch = unit(undb(catch_db * unit(uniform_filter1d(noise(), SR // 80))))
    scuff_colour = colour([(500, -34.0), (1800, 2), (4000, -7.5), (9000, -7.5), (16000, -17.0)])
    scuff = undb(-5.0) * through(noise(), scuff_colour)
    murmur = undb(-3.5) * through(noise(), panels)
    out = np.zeros(N)
    for start, end, scuff_db, rumble_db in RUBS:
        out += swell(start, end) ** 2 * (undb(scuff_db) * scuff + undb(rumble_db) * murmur)
    return catch * out


# light knocks on plastic trim: start_s [s], snap_db [dB], knock_db [dB] (hollow)
TICKS = [(5.865, -40.5, -38), (5.883, -49.5, -42), (5.901, -44, -48), (6.9262, -39, -56),
         (6.962, -44, -52.5), (7.18, -44.5, -63), (7.2055, -46, -39), (7.2567, -44, -50.5),
         (7.2902, -54.5, -43.5), (7.7605, -22, -29), (7.787, -28, -39), (7.825, -49, -46),
         (7.8405, -34, -39), (7.8746, -34.5, -43), (7.897, -44, -43), (8.026, -38, -54),
         (8.5153, -52.5, -41.5)]


def ticks(snap_t60=0.0097, knock_t60=0.04, knock_lag_s=0.0012, tail_db=-22, tail_t60=0.18,
          thump_db=-7, thump_t60=0.22):
    """Damped impact: a bright snap, then the hollow note of the trim and a soft thump of the panel under it."""
    snaps, knocks, thumps = np.zeros((3, N))
    t = T[:SR // 5]
    tail = undb(tail_db) * fade(t, tail_t60)
    for s, snap_db, knock_db in TICKS:
        add(snaps, s, undb(snap_db) * (fade(t, snap_t60) + tail))
        add(knocks, s + knock_lag_s, undb(knock_db) * (fade(t, knock_t60) + tail))
        add(thumps, s + knock_lag_s, undb(knock_db + thump_db) * fade(t, thump_t60))
    bright = through(noise(), colour([(1000, -12), (2200, 3.0), (4500, -3.0), (8000, -3.0), (16000, -15)]))
    hollow = through(noise(), modes([(450, 420, 2.0), (1070, 790, 1.0), (1890, 630, 2.0)]))
    soft = through(noise(), colour([(70, -14.0), (200, -4.0), (450, -11.5), (1000, -13.0), (3000, -49.0)]))
    return undb(-4.5) * (snaps * bright + knocks * hollow + thumps * soft)


def engine_bay(x, t60=0.028, share_db=-8, shift_hz=5, count=4):
    """Early reflections: bonnet and bulkhead scatter echoes whose pattern shifts as tool and arms move."""
    t = T[:SR // 16]
    echoes = rng.standard_normal((count, len(t))) * fade(t - .002, t60)
    echoes = echoes / np.linalg.norm(echoes, axis=1, keepdims=True)
    echoes = signal.sosfilt(signal.butter(3, 3300, "high", fs=SR, output="sos"), echoes)
    blend = np.array([walk(shift_hz) for _ in echoes])
    paths = signal.fftconvolve(x[None], echoes, axes=1)[:, :N]
    return x + undb(share_db) * np.sum(paths * blend, axis=0) / np.linalg.norm(blend, axis=0)


# long rings of the wing and bonnet: pitch_hz [Hz], width_hz [Hz], level_db [dB]
SHEETS = [(296, 2.8, 2.5), (636, 13, 4)]


def surroundings(x, t60=0.53, low_db=-17.0, high_db=-14, tail_db=-27, tail_t60=0.41, sheet_db=-10):
    """Reverberation: wing and bonnet ring on; nearby surfaces return faint tails, partly from the sides."""
    t = T[:SR // 2]
    lows, highs, tail = rng.standard_normal((3, len(t)))
    low_band = signal.butter(4, [330, 1100], "band", fs=SR, output="sos")
    high_band = signal.butter(8, [5500, 9500], "band", fs=SR, output="sos")
    lows = signal.sosfilt(low_band, lows * unit(fade(t - .004, t60)))
    highs = signal.sosfilt(high_band, highs * unit(fade(t - .001, 0.015)))
    sides = (undb(low_db) * lows + undb(high_db) * highs) * np.array([[1], [-1]])
    echo = (sides + undb(tail_db) * tail * unit(fade(t - .004, tail_t60))) / np.sqrt(len(t))
    sheet = irfft(rfft(x, PADDED) * modes(SHEETS), PADDED)[:N]
    return x + undb(sheet_db) * sheet + signal.fftconvolve(x[None], echo, axes=1)[:, :N]


def scene():
    """Superposition of sources: tool and hands in the engine bay, heard in the open air."""
    panels, case, head = modes(PANELS), modes(CASE), modes(HEAD)
    cowl = panels - modes(COWL)
    clank = clanks(cowl, case, head) + overtones()
    tool = whistles() + ratchet(panels, case, head) + after_ring() + squeaks() + fastener()
    hands = taps() + rubs(cowl) + ticks()
    return surroundings(engine_bay(clank + tool + hands)) + outdoors() + width(clank)


# phase between the two microphone ports: pitch_hz [Hz], left_lead [radians]
PORTS = [(0, 0), (5250, 0), (6630, -1.05), (9560, -2.3), (10400, -3.05), (13000, -3.22), (13500, -3.6),
         (14000, -4.1), (16500, -4.95)]
TOP_HZ = 16000


def record(dry, ceiling=1.0):
    """Interport phase: the phone's ports part in the treble; bass and top are cut and a limiter holds peaks."""
    lead = np.interp(HZ, *np.transpose(PORTS)) * np.array([[.5], [-.5]])
    ports = irfft(rfft(dry, PADDED) * np.exp(1j * lead), PADDED)[:, :N]
    ports = ports + undb(-81) * rng.standard_normal((2, N))  # each capsule hisses faintly
    ports = signal.sosfilt(signal.butter(4, 38, "high", fs=SR, output="sos"), ports)
    gain = ceiling / np.maximum(np.abs(ports).max(axis=0), ceiling)
    ports = ports * uniform_filter1d(minimum_filter1d(gain, size=SR // 300), size=SR // 300)
    return signal.sosfilt(signal.ellip(10, .2, 70, TOP_HZ, fs=SR, output="sos"), ports)


dry = scene()
out = record(dry)
materialize(out)
```